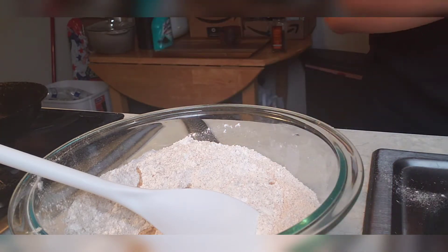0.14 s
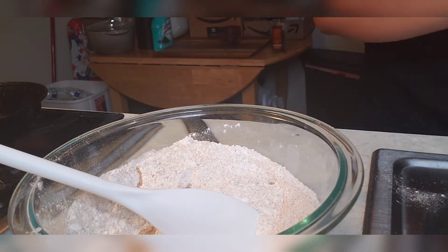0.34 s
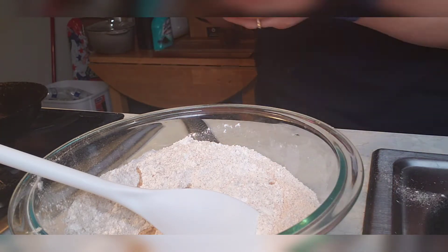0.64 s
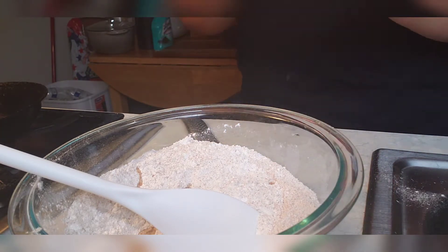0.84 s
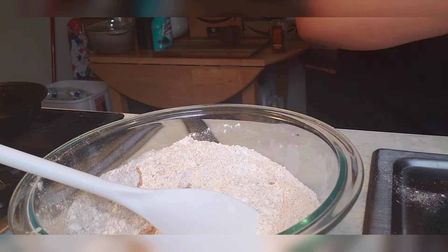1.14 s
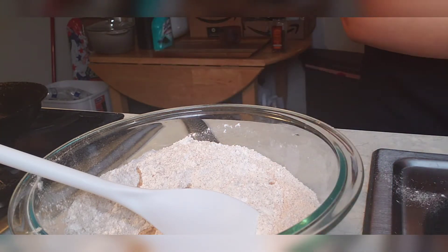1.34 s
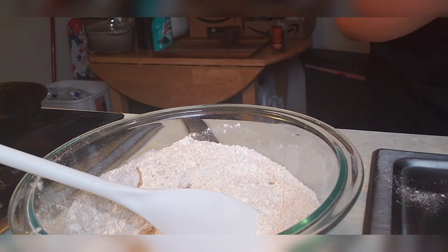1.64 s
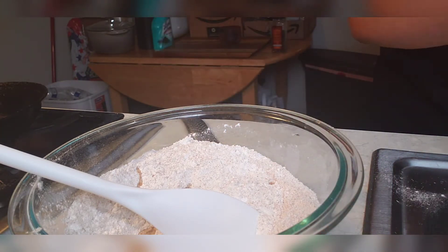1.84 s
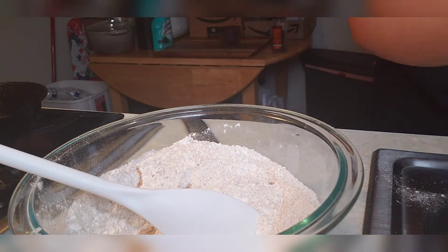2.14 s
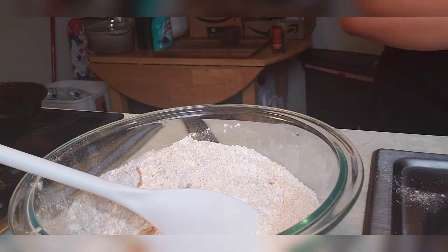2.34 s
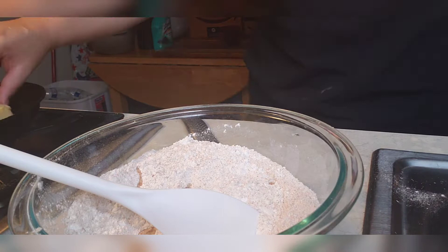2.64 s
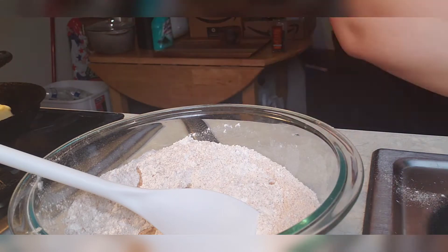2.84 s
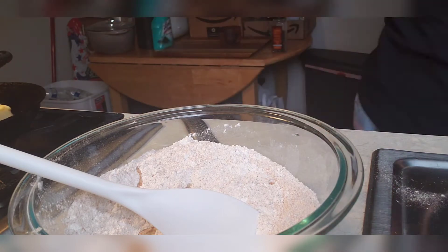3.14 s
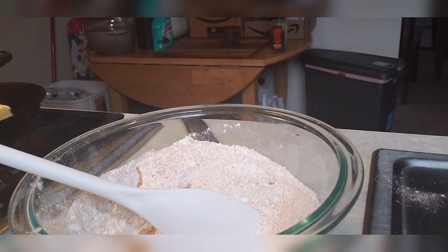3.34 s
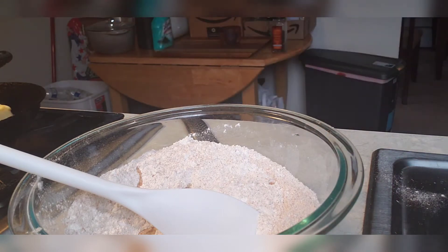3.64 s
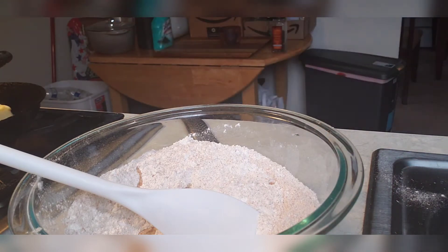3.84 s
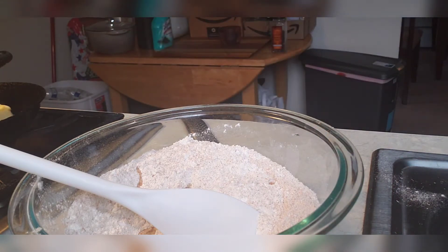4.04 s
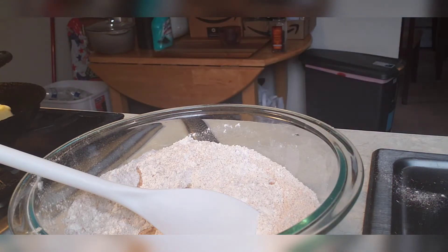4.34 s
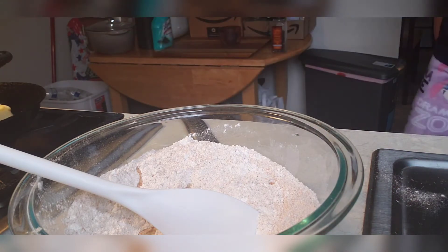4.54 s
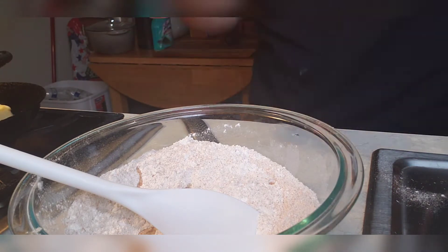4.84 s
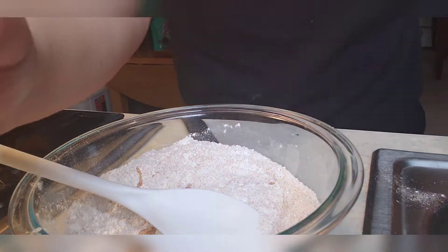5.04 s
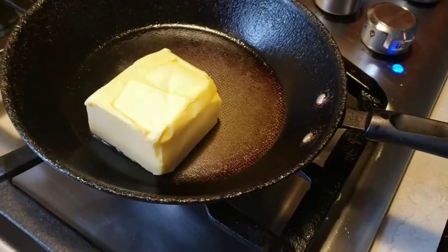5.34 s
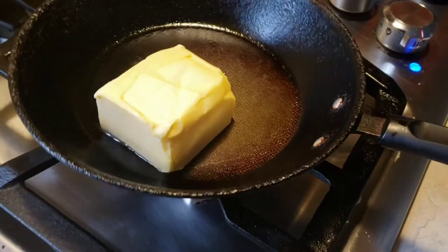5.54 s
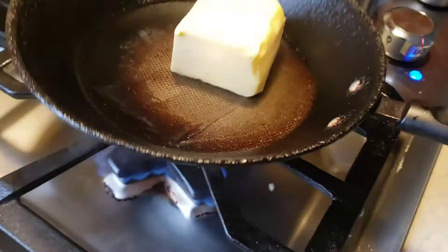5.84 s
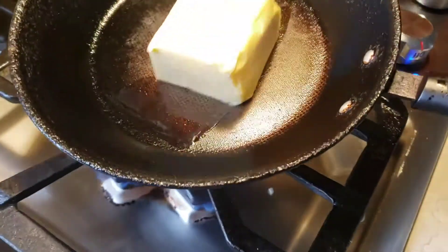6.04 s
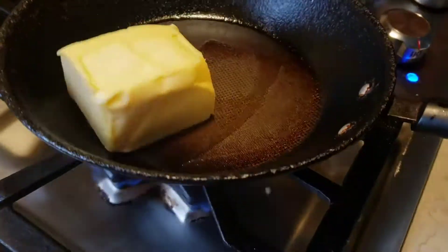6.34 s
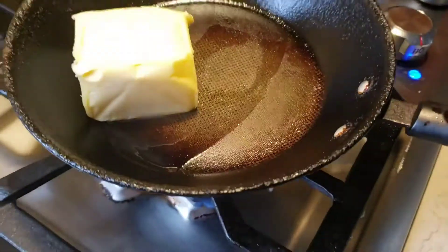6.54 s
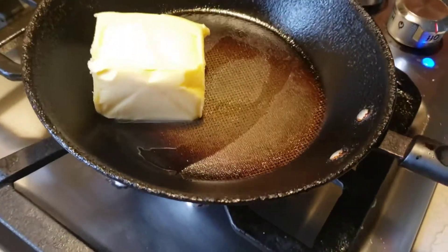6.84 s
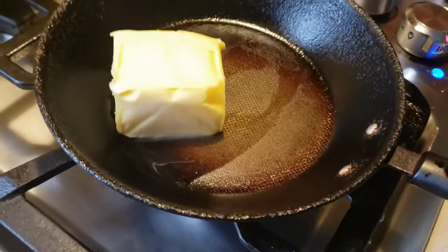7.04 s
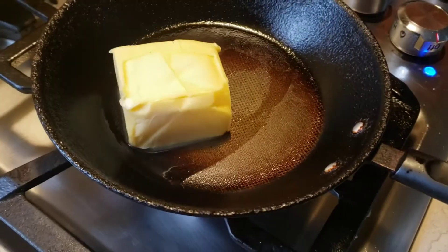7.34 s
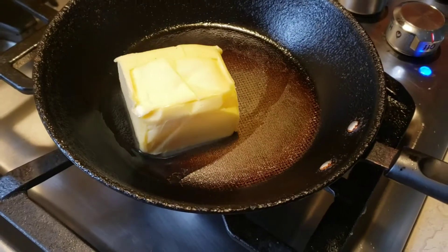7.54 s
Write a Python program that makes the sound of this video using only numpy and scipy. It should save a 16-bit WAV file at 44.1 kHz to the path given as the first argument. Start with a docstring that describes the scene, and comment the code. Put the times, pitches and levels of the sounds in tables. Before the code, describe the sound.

Stiff paper crinkles, butter thuds onto a counter, footsteps and a door bump follow, then an iron pan clanks over a low hum.

```python
"""Unwrapping in a quiet kitchen

A motor drones under soft room air. Stiff paper crinkles and snaps in someone's hands, a block thuds
onto the wooden counter, clothes brush, footsteps swing the floor and a door bumps shut.
After a short silence we are by the stove: an iron pan is lifted and clanks back onto the grate."""
import sys
import numpy as np
from scipy import signal
from scipy.fft import rfft, irfft, next_fast_len
from scipy.io import wavfile
from scipy.ndimage import uniform_filter1d

SR = 44100
rng = np.random.default_rng(int(sys.argv[2]) if len(sys.argv) > 2 else 0)


def put_to_file(sound):
    """Save the sound as 16-bit audio at rate SR, in the file named by the first command-line argument."""
    columns = np.atleast_2d(sound).T  # one column per channel
    safe = np.clip(columns, -1, 1)
    whole_steps = np.round(safe * 32767)
    wavfile.write(sys.argv[1], SR, whole_steps.astype(np.int16))


N = 339570
T = np.arange(N) / SR

# Motor overtones at the counter and the stove. Each row: multiple of the shaft rate, relative level in dB.
COUNTER_OVERTONES = [(1, -15.5), (2, -5.5), (3, -6.5), (4, 0.5), (5, 2), (6, -13.5), (7, -9), (8, -16),
                     (9, -9), (10, -26.5), (11, -22.5), (12, -30), (13, -26)]
STOVE_OVERTONES = [(1, -4), (2, -1.5), (3, -14.5), (4, -22.5), (5, -3.5), (6, -31), (7, -5.5), (8, -11),
                   (9, -18), (10, -21), (11, -19.5), (12, -21.5), (13, -25)]
# The drone's fader ride. Each row: time in seconds, level in dB.
DRONE_RIDE = [(0.0, -46), (0.4, -44), (1.45, -55), (2.0, -46.5), (3.6, -46.5), (4.12, -49), (4.25, -58),
              (4.63, -63.5), (5.06, -49), (7.7, -51)]
# Tone curves for air and appliance noise, cloth and paper. Each row: frequency in Hz, gain in dB.
COUNTER_AIR_EQ = [(15, -34), (25, -16), (82, 1.5), (145, -11.5), (236, -7), (285, -15), (427, -17.5),
                  (677, -29), (1040, -26), (2000, -53), (2160, -48.5), (5730, -53), (6500, -49),
                  (7600, -42), (8590, -57.5), (16000, -53.5)]
STOVE_AIR_EQ = [(15, -43), (25, -31.5), (87, 4), (166, -9), (236, -4), (285, -12.5), (344, -10.5),
                (427, -15.5), (1190, -25.5), (2000, -40.5), (5900, -49.5), (6400, -40), (7800, -41.5),
                (9320, -52.5), (14400, -46), (16000, -45)]
CLOTH_EQ = [(150, -33), (250, -8.5), (386, -8.5), (476, -13), (1240, -15.5), (1350, -15), (1910, -12.5),
            (7440, -15.5), (16000, -22)]
PAPER_EQ = [(240, -34.5), (400, -0.5), (666, -4), (1330, 0), (1580, -5), (2750, -3), (3640, -6),
            (7630, -4.5), (9040, -11.5), (11800, -6), (16000, -9)]
# A thin whine. Each row: centre in Hz, width in Hz, level in dB before its fader ride.
WHINE_BANDS = [(3170, 140, -85.5), (5265, 200, -93)]
# The whine's fader ride. Each row: time in seconds, gain.
WHINE_RIDE = [(5.62, 0.23), (5.7, 2.1), (5.9, 1.07), (6.5, 0.89), (6.56, 0.15)]
# Rustle bands that flicker on their own. Each entry: centre in Hz.
FLICKER_BANDS = [250, 500, 900, 1400, 2000, 2700, 3600, 4800, 6300, 8000, 10500, 13500, 18000]
# Brushes of hands and clothes, and pulls on the wrapper. Each row: crest time in seconds, rise in
# seconds, hold in seconds, level in dB, relative body in dB, left over right in dB.
CLOTH_BRUSHES = [(2.455, 0.043, .015, -74, -7, 8), (2.545, 0.033, 0.0191, -55.5, 5, 1),
                 (2.615, 0.046, 0.0093, -59, -2, -7), (2.835, 0.055, .02, -71.5, -5.5, 6),
                 (2.92, 0.12, 0.027, -74, 3, 9), (3.02, 0.044, 0.051, -58, -4, 2),
                 (3.14, 0.079, 0.068, -56.5, -0.5, 1.5), (3.29, 0.11, .14, -56.5, 1, 1),
                 (3.545, 0.071, 0.014, -41, 3, 0.5), (3.585, .05, 0.0046, -55.5, 0, 2),
                 (3.64, .08, 0.1, -72, 0, 2), (3.925, 0.098, 0.011, -51, 4, 0.5),
                 (3.985, .06, 0.012, -59, 3, 2), (4.3, 0.036, 0.011, -50.5, -2, 0),
                 (4.345, 0.045, 0.004, -40.5, 4.5, 1.5), (4.46, 0.11, .02, -65, -3, 2),
                 (4.53, 0.15, 0.14, -71, 1.5, 2.5), (4.745, 0.041, 0.028, -69, 7.5, 2),
                 (5.43, 0.1, 0.094, -73.5, -6.5, 3.5)]
WRAPPER_PULLS = [(.005, 0.022, 0.011, -61.5, -20, 1), (.035, 0.047, 0.016, -57, -18, 1),
                 (.205, 0.019, 0.041, -53, -11, 3), (.285, .04, 0.0066, -63.5, -6, 1),
                 (.4, 0.018, 0.012, -49, -18, 5), (.45, 0.065, .02, -54, -19, 2),
                 (.485, .04, 0.025, -45.5, -10, 2), (.525, 0.032, 0.0033, -50.5, 0, 2.5),
                 (.565, 0.068, 0.033, -49, -8, 3.5), (.625, 0.026, 0.0056, -22.5, -12, 1.5),
                 (.735, 0.067, 0.0093, -62, -24, 0.5), (.865, 0.015, 0.0033, -41, -23, -4),
                 (.91, 0.045, 0.0065, -28.5, -20, 4), (.945, 0.035, 0.022, -42, -24, 1.5),
                 (1.022, 0.015, 0.014, -25.5, -18.5, 3.5), (1.165, 0.056, 0.0089, -52, -27, 4.5),
                 (1.215, 0.046, 0.029, -43.5, -8, 3.5), (1.26, 0.015, 0.0054, -32.5, -8.5, 1.5),
                 (1.355, 0.15, 0.02, -48, -6.5, 2.5), (1.425, 0.067, 0.0052, -44, -16, 5.5),
                 (1.53, 0.048, 0.0074, -28, -13.5, 2.5), (1.63, .05, 0.07, -44.5, -8.5, 3.5),
                 (1.79, 0.061, 0.028, -38, -20.5, 4.5), (1.87, 0.11, 0.026, -55.5, -4, 5),
                 (2.015, 0.097, 0.018, -53, -11, 5), (2.068, 0.02, 0.021, -47.5, -5, 1),
                 (2.12, 0.11, 0.044, -54, -8, 1), (2.19, 0.047, 0.021, -33.5, -1.5, 5),
                 (2.23, 0.047, 0.018, -48, -7, 5.5)]
# Creases giving way. Each row: start in seconds, level in dB, relative body in dB, left over right in dB.
CREASE_SNAPS = [(0.0285, -28, -30, 6.5), (0.394, -17.5, -17, 4), (0.519, -25, -16.5, 2),
                (0.6271, -7, -25, 2), (0.859, -19, -11.5, 0.5), (1.0181, -15, -15.5, 2),
                (1.157, -31, -27, 5), (1.256, -16.5, -5, 5), (1.349, -36, -15, 8), (1.495, -33, -12.5, 4),
                (1.626, -33, -24, 3), (1.687, -34, -11, 12), (2.066, -22.5, -17.5, 4.5),
                (2.1891, -18, -3, 10.5)]
# Footfalls through the floor. Each row: cue in seconds, level in dB, pitch in Hz.
FOOTFALLS = [(2.948, -41, 53), (3.179, -42, 40.6), (3.53, -22, 75), (3.548, -28, 45.4), (3.569, -24.5, 88),
             (4.334, -28, 52.4), (4.353, -18, 74.5), (4.59, -37.5, 42.3), (4.739, -46, 40.4)]
# Thuds on counter and door. Each row: start in seconds, level in dB, relative boom in dB,
# relative treble in dB, left over right in dB, rise in seconds.
WOOD_HITS = [(2.536, -23.5, -1, -1.5, 0.5, 0.014), (2.553, -20.5, -6, -5.5, 1, 0.008),
             (2.612, -19, -2.5, -10, -3.5, 0.011), (2.628, -13, -7.5, -19, -0.5, 0.0035),
             (2.655, -42, -6, -37, 6, .006), (4.129, -8.5, 1, -10.5, 0.5, 0.0039),
             (4.139, -10, 2.5, -22.5, -2, 0.002), (4.171, -22, 0, -14.5, -0.5, 0.0038),
             (4.336, -32.5, 3.5, 7, -2, 0.01)]
# Pan against grate. Each row: start in seconds, level in dB, relative clunk in dB,
# relative tick in dB, left over right in dB, scrape decay in seconds.
PAN_HITS = [(5.425, -52, -5, -15, 1, 0.0043), (5.487, -51, 3.5, -20, -0.5, 0.0072),
            (5.547, -40.5, 4, -34, 0, 0.0093), (5.566, -36.5, 8, -37, 1, 0.012),
            (6.575, -28, -10, 0.5, 11, .007), (6.582, -28, 8, 4, 2, 0.017), (6.608, -31.5, 0, -6, 0, 0.027),
            (6.645, -28.5, 2.5, -4, 1, 0.027), (6.654, -12.5, -16.5, -15, 6.5, 0.00073),
            (6.676, -13.5, -19, -33, -7, 0.0021), (6.685, -23, -11, -24, 13, 0.00062),
            (6.725, -31, -17, -28, -5, 0.0021), (6.732, -16, -17, -15, 5.5, 0.0017),
            (6.754, -38, 2, -16, 0, 0.011), (6.811, -30, -22, -21, 5, 0.012),
            (6.823, -31, -2.5, -29, 1.5, 0.012)]
# Resonances of the wood, its low boom, the pan and the stove top.
# Each row: pitch in Hz, width in Hz, gain in dB.
WOOD_MODES = [(405.6, 145, -1), (625, 160, -7), (495, 120, -4), (808, 131, -0.5), (1440, 540, -6.5),
              (1790, 830, -10), (2910, 534, -12.5)]
BOOM_MODES = [(75, 26, -8.5), (224, 100, 1)]
IRON_MODES = [(846, 140, 1), (1074, 177, 6.5), (1440, 218, 7), (1726, 270, 2), (2150, 65, -1.5),
              (2400, 210, -8), (2805, 46, -0.5), (3360, 48, -12.5), (4220, 120, -24.5), (7230, 400, -21)]
STOVE_TOP_MODES = [(130.2, 41, 2), (297, 51, 4.5), (608, 75, -9)]

COUNTER_END_S, STOVE_START_S, STOVE_FULL_S = 5.141, 5.181, 5.20
SHAFT_HZ, SHAFT_WAVER = 46.43, .004


def undb(db):
    """Decibels to gain."""
    return 10 ** (np.asarray(db) / 20)


def level(x, db):
    """Set the RMS level."""
    return x * undb(db) / np.sqrt(np.mean(x ** 2))


def unit_peak(x):
    """Normalise the peak to 1."""
    return x / np.max(np.abs(x))


def hertz(x):
    """Frequencies of the spectrum of x, floored at 1 Hz."""
    return np.maximum(np.arange(x.shape[-1] // 2 + 1) * SR / x.shape[-1], 1.)


def equalise(x, curve):
    """Apply a tone curve joined on a log frequency axis."""
    hz, db = np.transpose(curve)
    return irfft(rfft(x) * undb(np.interp(np.log(hertz(x)), np.log(hz), db)), x.shape[-1])


def band(x, lo_hz, hi_hz):
    """Gentle band-pass."""
    return signal.sosfilt(signal.butter(2, [lo_hz, hi_hz], "bandpass", fs=SR, output="sos"), x)


def ring(x, modes):
    """Sum of resonances, alternating in polarity."""
    return sum((-1) ** k * undb(db) * signal.lfilter(*signal.iirpeak(hz, hz / width, SR), x)
               for k, (hz, width, db) in enumerate(modes))


def wander(rate_hz, size=N):
    """Smooth random modulation with a spread near 1."""
    held = np.repeat(rng.standard_normal(N // 500 + 2), 8)
    slewed = uniform_filter1d(uniform_filter1d(held, size=8), size=8)
    return 1.3 * np.interp(T[:size] * rate_hz * 8, np.arange(len(held)), slewed)


def panned(x, pan_db):
    """Mono to stereo; positive leans left."""
    return x * undb(np.outer([1, -1], pan_db) / 2)


def add(out, start_s, sound):
    """Mix a stereo sound in on its cue."""
    i = max(int(start_s * SR), 0)
    out[:, i:i + sound.shape[1]] += sound[:, :N - i]


def diffuse(mid, side, crossover_hz=410):
    """Spaced-microphone width: bass alike on both sides, treble unrelated."""
    ratio = (hertz(mid) / crossover_hz) ** 1.7
    width = ratio / (1 + ratio)
    centre = rfft(mid) * np.sqrt(1 - width / 2)
    edges = rfft(side) * np.sqrt(width / 2)
    return irfft(np.array([centre + edges, centre - edges]), len(mid))


def room(dry, wet_db, t60_s, tail_s, lag_samples):
    """Direct sound, later on the right, and close reflections that stop short."""
    t = T[:SR // 10]
    gate = np.clip((tail_s - t) / .012, 0, 1) * np.clip(t / 0.0032, 0, 1)
    reflections = rng.standard_normal((2, len(t))) * np.exp(-np.log(1000) * t / t60_s) * gate
    response = level(diffuse(*reflections), wet_db) / np.sqrt(len(t))
    response[0, 0] += 1
    response[1, lag_samples] += 1
    return signal.oaconvolve(dry, response, axes=1)[:, :N]


def chatter(decay_s, grit, rise_s=0.0009):
    """A rough contact: gritty noise with a quick attack and a short decay."""
    t = T[:SR // 10]
    noise = rng.standard_normal(len(t)) * np.exp(grit * rng.standard_normal(len(t)))
    return noise * np.exp(-np.maximum(t - rise_s, 0) / decay_s) * np.clip(t / rise_s, 0, 1) ** 2


def motor_drone():
    """The bed: wavering motor overtones over air noise, voiced for the counter and then the stove."""
    shaft_phase = 2 * np.pi * np.cumsum(SHAFT_HZ * (1 + SHAFT_WAVER * wander(2.5))) / SR
    ride_db = np.interp(T, *np.transpose(DRONE_RIDE))
    out = np.zeros((2, N))
    cut = int(STOVE_START_S * SR)
    for span, overtones, air_eq, air_db in ((slice(0, cut), COUNTER_OVERTONES, COUNTER_AIR_EQ, -48),
                                            (slice(cut, N), STOVE_OVERTONES, STOVE_AIR_EQ, -49.5)):
        size = len(T[span])
        hum = np.zeros(size)
        for multiple, db in overtones:
            gain = undb(db + 2.1 * wander(6, size))
            drift = 2 * np.pi * rng.random() + .5 * wander(4.5, size)
            hum += gain * np.sin(multiple * shaft_phase[span] + drift)
        air = level(diffuse(*equalise(rng.standard_normal((2, N)), air_eq)), air_db)
        air *= undb(0.22 * (ride_db - np.mean(ride_db)) + 0.36 * wander(3.2))  # breathes with the hum
        out[:, span] = panned(level(hum, 0) * undb(ride_db[span]), 1.2) + air[:, span]
    return out


def whine():
    """Two faint, fluttering bands of noise that come forward between the pan's lift and landing."""
    hiss = sum(level(band(rng.standard_normal(N), hz - width / 2, hz + width / 2), db)
               for hz, width, db in WHINE_BANDS)
    return hiss * undb(3.0 * wander(38)) * np.interp(T, *np.transpose(WHINE_RIDE))


def rustle(moves, eq, fall_db_per_s, grain_db, flicker_db):
    """Dense tiny creases of uneven size; each move swells, holds and dies while the colour flickers."""
    size = min(next_fast_len(int((moves[-1][0] + .4) * SR)), N)
    grains = rng.standard_normal((2, N)) * undb(grain_db * (rng.exponential(size=N) + wander(70)))
    sheet = diffuse(*equalise(grains[:, :size], eq))
    octaves, spectrum = np.log2(hertz(sheet)), rfft(sheet)
    bands = []
    for solo in np.eye(len(FLICKER_BANDS)):
        window = np.interp(octaves, np.log2(FLICKER_BANDS), solo)
        bands.append(irfft(spectrum * window, size) * undb(flicker_db * wander(25, size)))
    top_power, body_power = np.zeros((2, 2, size))
    for crest_s, rise_s, hold_s, db, body_db, pan_db in moves:
        first = max(int((crest_s - 2 * rise_s) * SR), 0)
        last = min(int((crest_s + hold_s + 0.086) * SR), size)
        t = T[first:last] - crest_s
        attack_db = 30 * np.minimum(t, 0) / rise_s
        release_db = -fall_db_per_s * np.maximum(t - hold_s, 0)
        power = panned(undb(db + attack_db + release_db), pan_db) ** 2
        top_power[:, first:last] += power
        body_power[:, first:last] += power * undb(2 * body_db)
    body, middle, sizzle = sum(bands[:4]), sum(bands[4:9]), sum(bands[9:])
    top = (middle + sizzle) / np.std(middle)
    mix = np.sqrt(top_power) * top + np.sqrt(body_power) * level(body, 0)
    return np.pad(mix, ((0, 0), (0, N - size)))


def clothes():
    """Hands and cloth brush in soft, even swishes as the body moves."""
    return rustle(CLOTH_BRUSHES, CLOTH_EQ, fall_db_per_s=452.5, grain_db=3, flicker_db=-0.35)


def footsteps():
    """Each footfall swings the floor for a cycle or two of low thump."""
    out, t = np.zeros((2, N)), T[:SR // 5]
    for cue_s, db, hz in FOOTFALLS:
        swing = np.sin(2 * np.pi * hz * t) * hz * t * np.exp(-hz * t / 0.3)
        add(out, cue_s - .008, panned(unit_peak(swing) * undb(db), 1.5))
    return out


def wood_thuds():
    """Soft, heavy contacts shake the wooden panels of counter and door."""
    out = np.zeros((2, N))
    for start_s, db, boom_db, treble_db, pan_db, rise_s in WOOD_HITS:
        contact = chatter(decay_s=0.0056, grit=0.62, rise_s=rise_s)
        wood = unit_peak(ring(contact, WOOD_MODES))
        boom = undb(boom_db) * unit_peak(ring(contact, BOOM_MODES))
        slap = undb(treble_db) * unit_peak(band(contact, 1800, 4060))
        add(out, start_s, panned((wood + boom + slap) * undb(db), pan_db))
    return room(out, wet_db=-1.5, t60_s=0.073, tail_s=0.066, lag_samples=8)


def iron_pan():
    """Damped cast iron on the grate: a mid clank, a low clunk from the stove top and a tick."""
    out = np.zeros((2, N))
    for start_s, db, clunk_db, tick_db, pan_db, decay_s in PAN_HITS:
        contact = chatter(decay_s, grit=0.65)
        clank = unit_peak(ring(contact, IRON_MODES))
        clunk = undb(clunk_db) * unit_peak(ring(contact, STOVE_TOP_MODES))
        tick = undb(tick_db) * unit_peak(band(contact, 2100, 3980))
        add(out, start_s, panned((clank + clunk + tick) * undb(db), pan_db))
    return room(out, wet_db=-4, t60_s=0.053, tail_s=0.065, lag_samples=8)


def paper_crinkle():
    """Each pull on the stiff wrapper sets off a bright, restless spray of creases."""
    return rustle(WRAPPER_PULLS, PAPER_EQ, fall_db_per_s=601, grain_db=2.5, flicker_db=4.5)


def paper_snaps():
    """A few creases give way in a short, broad crack."""
    out = np.zeros((2, N))
    for start_s, db, body_db, pan_db in CREASE_SNAPS:
        buckle = chatter(decay_s=0.00083, grit=1.0)
        crack = unit_peak(band(buckle, 2900, 14000))
        body = undb(body_db) * unit_peak(band(buckle, 900, 2400))
        add(out, start_s, panned((crack - body) * undb(db), pan_db))
    return room(out, wet_db=0.26, t60_s=0.048, tail_s=0.11, lag_samples=20)


def scene():
    """The full mix, muted for a moment between counter and stove."""
    mute = np.interp(T, [COUNTER_END_S - .002, COUNTER_END_S, STOVE_START_S, STOVE_FULL_S], [1, 0, 0, 1])
    rustles = paper_crinkle() + clothes()
    bed = motor_drone() + whine()
    hits = paper_snaps() + wood_thuds() + footsteps() + iron_pan()
    return mute * (bed + rustles + hits)


def record(dry):
    """A steep low-pass trims the very top."""
    cutoff_hz = 15900
    return signal.sosfilt(signal.ellip(10, .2, 80, cutoff_hz, fs=SR, output="sos"), dry)


dry = scene()
out = record(dry)
put_to_file(out)
```